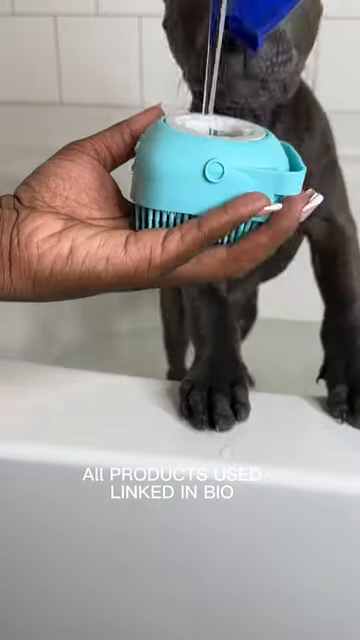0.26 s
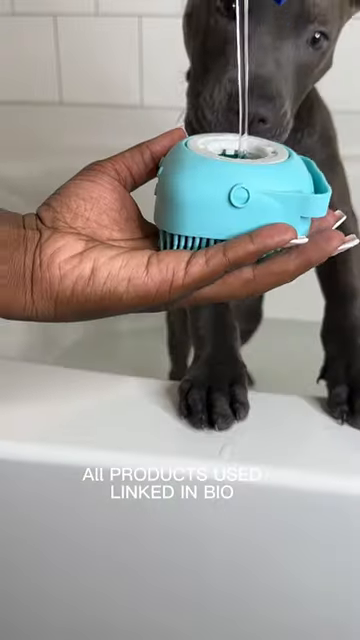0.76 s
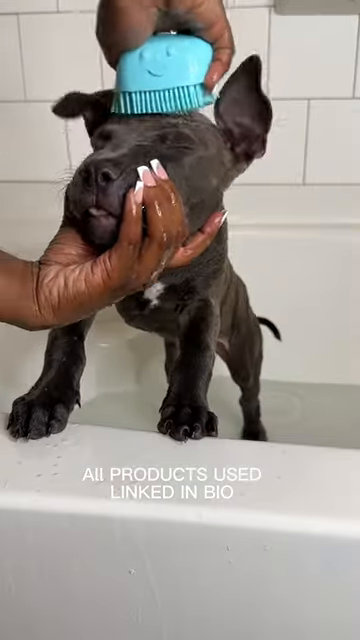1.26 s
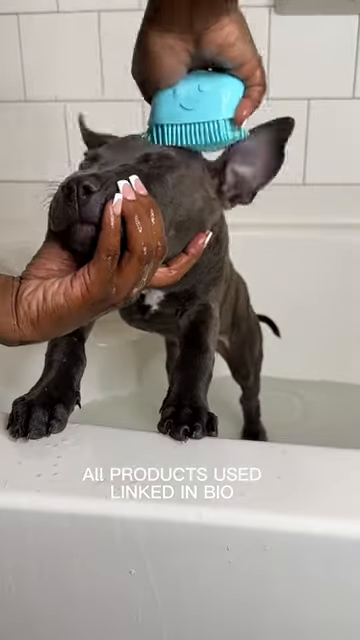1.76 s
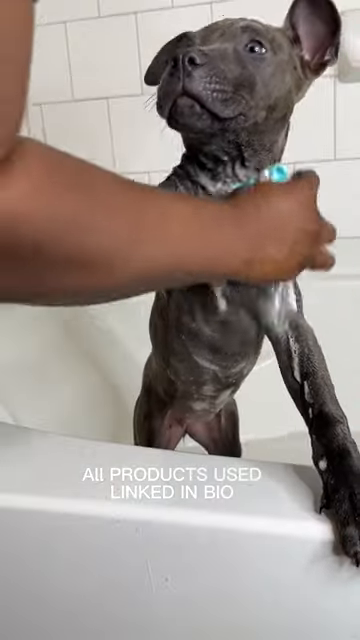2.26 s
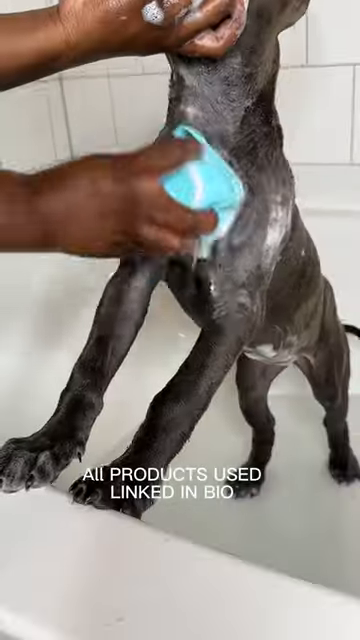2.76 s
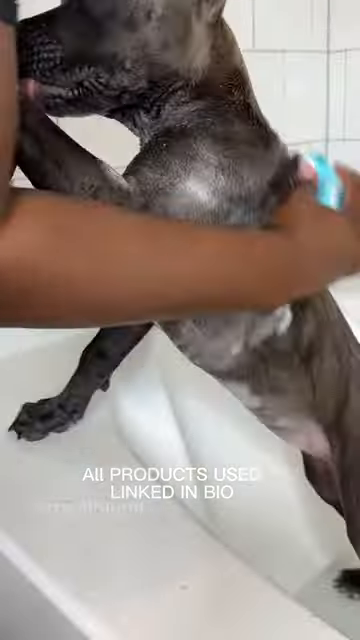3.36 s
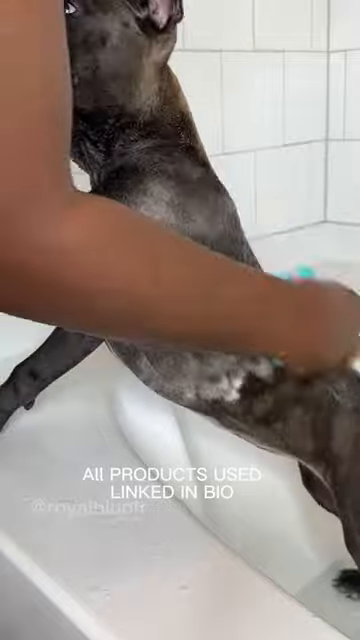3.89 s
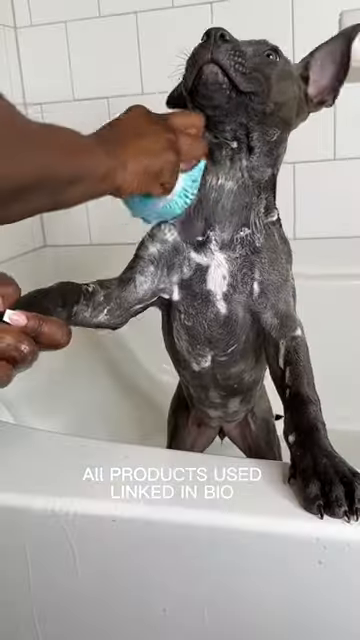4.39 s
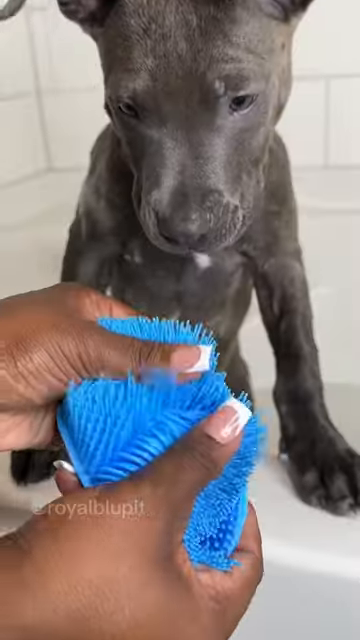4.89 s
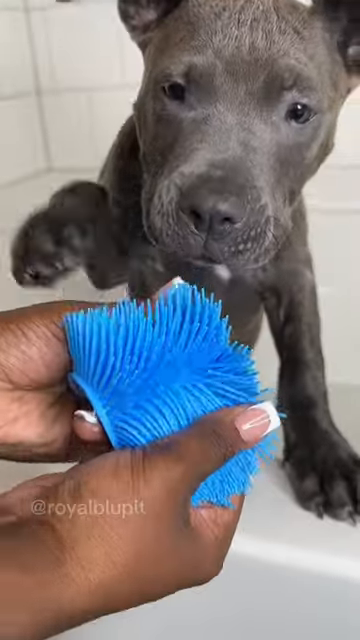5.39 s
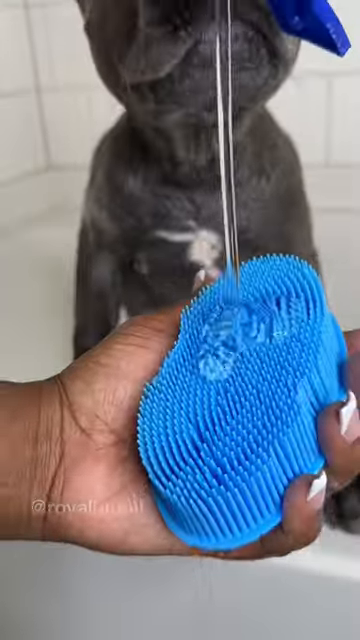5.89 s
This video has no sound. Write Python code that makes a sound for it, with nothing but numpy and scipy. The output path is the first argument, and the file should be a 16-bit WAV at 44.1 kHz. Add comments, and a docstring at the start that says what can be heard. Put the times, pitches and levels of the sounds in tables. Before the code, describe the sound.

Shampoo trickles and bubbles into a hollow brush, wet scrubbing rasps and squeaks on fur, soft bristles riffle, then gel plops in a tiled bathroom.

```python
"""Washing a dog in a tub

In a string of short cuts, shampoo trickles and bubbles into a hollow brush (ringing bubbles and resonances),
the brush scrubs wet fur (coloured grit that follows strokes) and squeaks while paws shake the tub (low modes),
thumbs riffle soft bristles (clumped ticks) and gel plops onto a mitt (bubbles again).
A tiled bathroom hums faintly behind (coloured noise); a small two-port microphone is close by."""
import sys
import numpy as np
from scipy import signal
from scipy.fft import rfft, irfft
from scipy.io import wavfile
from scipy.ndimage import uniform_filter1d

SR = 44100
rng = np.random.default_rng(int(sys.argv[2]) if len(sys.argv) > 2 else 0)


def transcribe(signal):
    """Save signal, clipped to [-1, 1], as a 16-bit WAV file at the path in sys.argv[1]."""
    frames = np.atleast_2d(signal).T
    limited = np.clip(frames, -1, 1)
    pcm = np.round(limited * 32767).astype(np.int16)
    wavfile.write(sys.argv[1], SR, pcm)


def ratio_of_db(decibels):
    """Turn decibels (scalar or array-like) into linear amplitude factors; 0 dB maps to 1."""
    return 10 ** (np.asarray(decibels, float) / 20)


N = 270774

# The two pours, as curves over time. Each row: time in seconds, gain of the fizz in dB,
# gain of the air cavity in dB, cavity pitch in Hz.
POURS = [
    [(0.238, -67, -99, 1030), (0.27, -77, -100, 1100), (0.414, -71, -103, 940), (0.575, -64, -60, 1090),
     (0.625, -61.5, -49, 1090), (0.69, -73, -60, 880), (0.8, -69.5, -57.5, 920), (1.0, -73, -62.5, 983),
     (1.084, -69, -74.5, 1140), (1.17, -67.5, -58, 1150)],
    [(5.79, -74, -69, 1080), (5.855, -62, -77, 830), (5.875, -52.5, -55, 724), (5.93, -67.5, -57, 750),
     (5.966, -53, -67, 940), (6.03, -65, -63, 740), (6.045, -58, -53, 850), (6.14, -56.5, -65, 770)],
]


def scrub():
    """Bristles drag through lather: dense grit, split into squelch, rasp and fizz that follow each stroke."""
    # Colour of the rubbing. Each row: frequency in Hz, density in dB per Hz.
    fur = [(300, -6.5), (450, -11.5), (1220, -21.5), (2560, -24), (3330, -24), (6730, -24), (9000, -27),
           (12000, -26), (16000, -42)]
    rub = coloured(grit(900, 3.7, 1.97), fur)
    # uneven patches in time and pitch
    _, _, z = signal.stft(rub, SR, nperseg=512)
    patches = uniform_filter1d(rng.standard_normal(z.shape), 6, 0)
    patches = evened(uniform_filter1d(patches, 5, 1))
    rub = signal.istft(z * ratio_of_db(2.3 * patches), SR, nperseg=512)[1][:N]

    stroke = pressure(0)
    squelch = pressure(1) * evened(band(rub, 444, 937))
    rasp = stroke * evened(band(rub, 1080, 2705))
    # the fizz swings less than the stroke; its balance per cut holds for a stroke at the pivot level
    pivot_db, follow = -55, 0.84
    fizz_gain = ratio_of_db(per_cut(1) + pivot_db) * (stroke / ratio_of_db(pivot_db)) ** follow
    fizz = fizz_gain * evened(band(rub, 3650, SR * 0.4))
    out = squelch + rasp + fizz
    add_smacks(out, fur)
    return out


def add_smacks(out, fur):
    """Wet landings of the brush: wide noise mixed with a foam pocket whose pitch sinks as it dies."""
    # Each row: time in seconds, peak in dB, pitch it sinks to in Hz, decay by 60 dB in seconds,
    # share of wide noise from 0 to 1.
    smacks = [(1.3546, -44, 3150, 0.45, 0), (1.503, -44, 5700, 0.11, 0.5), (1.93, -38, 1780, 0.026, 0.05),
              (2.0249, -38, 4050, 0.085, 0.82), (2.106, -36.5, 840, 0.32, 0), (2.489, -39, 700, 0.19, 0.1),
              (2.621, -44.5, 920, 0.3, 0.64), (2.893, -40, 1290, 0.33, 0), (3.177, -47, 1380, 0.044, 0.22),
              (3.688, -53, 1000, 0.088, 0.4), (3.833, -40, 1810, 0.041, 0.1), (3.986, -44, 820, 0.15, 0.3),
              (4.12, -48.5, 1600, 0.079, 0.2), (4.251, -40, 1500, 0.011, 0.2),
              (4.2657, -42, 1400, 0.033, 0.26), (4.419, -42, 1440, 0.014, 0)]
    sink, sink_s = 0.35, 0.025  # starts this share too high; time constant
    width_share, land_s = 0.55, 0.0008  # resonator width over pitch; landing time constant
    t = np.arange(SR // 4) / SR
    for s, db, hz, t60, share in smacks:
        puff = rng.standard_normal(len(t))
        wide = coloured(puff, fur)
        glide_hz = hz * (1 + sink * np.exp(-t / sink_s))
        pocket = resonate_twice(puff, glide_hz, width_share * hz)
        burst = share * evened(wide) + (1 - share) * evened(pocket)
        tick = 0.34 * np.exp(-t / 0.00059)
        burst *= (ratio_of_db(-60 * t / t60) + tick) * (1 - np.exp(-t / land_s))
        add(out, s, ratio_of_db(db) * burst / abs(burst).max())


def trickle():
    """Tiny bubbles, the walls and air space of the filling brush that drops excite, and the big bubbles."""
    # Pitches that the small bubbles favour. Each row: frequency in Hz, density in dB per Hz.
    bubble_pitches = [(880, -15), (1500, 2.5), (1880, -5), (2410, -0.5), (2830, -11), (3620, -8.5),
                      (4370, -13), (4970, -8.5), (6180, -13), (7460, -6.5), (10900, -1), (15100, -34),
                      (16000, -38)]
    # Single bubbles. Each row: time in seconds, peak in dB, starting pitch in Hz,
    # decay by 60 dB in seconds (capped below).
    big_bubbles = [(0.2452, -42.5, 5330, 0.018), (0.272, -32.5, 4840, 0.0076), (0.3986, -38, 2880, 0.016),
                   (0.4114, -40.5, 5100, 0.0049), (0.4202, -42, 3030, 0.014), (0.425, -33.5, 1610, 0.0047),
                   (0.4464, -35, 6970, 0.003), (0.45, -44.5, 3120, 0.015), (0.468, -38, 1600, 0.012),
                   (0.491, -39.5, 7240, 0.0094), (0.4917, -42.5, 1810, 0.013), (0.517, -40.5, 3360, 0.015),
                   (0.5566, -41.5, 4900, 0.0091), (0.556, -41, 1676, 0.08), (0.59, -30.5, 1090, 0.023),
                   (0.613, -40.5, 1250, 0.054), (0.624, -40.5, 1350, 0.015), (0.629, -53, 2770, 0.035),
                   (0.633, -32, 1070, 0.025), (0.641, -29, 1116, 0.036), (0.656, -40.5, 4280, 0.011),
                   (0.663, -34.5, 1110, 0.019), (0.683, -40.5, 3000, 0.015), (0.724, -43, 980, 0.031),
                   (0.745, -44, 946, 0.07), (0.763, -39, 1050, 0.027), (0.779, -46, 940, 0.032),
                   (0.79, -39.5, 913, 0.052), (0.8044, -40, 3060, 0.008), (0.832, -46.5, 895, 0.033),
                   (0.8628, -38.5, 4300, 0.008), (0.97, -54, 980, 0.025), (1.042, -45, 2600, 0.016),
                   (1.098, -46.5, 1750, 0.01), (1.099, -40.5, 2800, 0.018), (1.124, -35.5, 1490, 0.0056),
                   (5.8156, -42, 4190, 0.021), (5.818, -50, 1140, 0.032), (5.8656, -39.5, 6600, 0.035),
                   (5.868, -32.5, 732, 0.0098), (5.914, -34.5, 4280, 0.018), (5.913, -36.5, 5430, 0.011),
                   (5.9563, -37, 4200, 0.024), (5.956, -45, 2570, 0.022), (5.962, -43.5, 1620, 0.03),
                   (5.932, -52, 1670, 0.026), (6.056, -42, 1760, 0.081), (6.003, -50, 3330, 0.023),
                   (6.07, -42, 2770, 0.03), (5.9688, -33.5, 2760, 0.012), (5.97, -34.5, 4240, 0.02),
                   (6.0365, -42, 2800, 0.01), (6.039, -40.5, 448, 0.0048), (6.051, -31, 2380, 0.0048),
                   (6.051, -30.5, 1870, 0.018), (6.081, -38.5, 740, 0.0031), (6.0903, -46, 5200, 0.039),
                   (6.133, -49, 4360, 0.013)]
    mist = evened(coloured(rng.standard_normal(N), bubble_pitches))
    tiny = grains(bubble_pitches, 1757, 12030, per_s=22, cycles=21, onset=5.4, spread_db=4.15, clump=1.1)
    in_brush = np.arange(N) < POURS[0][-1][0] * SR  # until the first pour ends
    froth = 1.2 * tiny + np.where(in_brush, 2.7 * brush_walls() + 0.08 * mist, 0.7 * mist)

    sway = 1 + 0.015 * wander(5, 40)
    cavity_hz = curve(POURS, 3, off=1200) * sway
    slosh = grit(170, 2, 0.35)
    cavity = evened(resonate_twice(slosh, cavity_hz, 130, 200))
    out = ratio_of_db(curve(POURS, 1)) * froth + ratio_of_db(curve(POURS, 2)) * cavity
    for s, db, hz, t60 in big_bubbles:
        add(out, s, ratio_of_db(db) * plop(hz, min(t60, 0.09), rng.standard_normal(SR // 10)))
    return out


def brush_walls():
    """Drops landing on the hollow brush ring its modes, whose pitches drift and levels waver."""
    # Modes of the hollow brush. Each row: mean frequency in Hz, width of the first resonator in Hz, level in dB.
    modes = [(1900, 180, -8), (2950, 200, 4.5), (4420, 200, 1), (6300, 330, -1), (7800, 300, -5)]
    landing = grit(70, 4, 0.05)  # shared by all modes
    walls = np.zeros(N)
    for hz, width, db in modes:
        drops = (0.5 * landing + grit(300, 3.5, 0.25)) * ratio_of_db(4 * wander(2, 12))
        drifting_hz = hz * (1 + 0.04 * wander(3, 25))
        walls += ratio_of_db(db) * evened(resonate_twice(drops, drifting_hz, width, 2.8 * width))
    return evened(walls)


def plop(hz, t60, noise):
    """A big bubble: a ring held for a moment, roughened by the splash around it and the landing thud."""
    tone = ring(hz, t60, 0.078, 1.26)
    t = np.arange(len(tone)) / SR
    noise = noise[:len(t)]
    splash = evened(resonate_twice(noise, hz, 0.27 * hz, 0.29 * hz))
    splash *= np.exp(-(t / (0.42 * t60)) ** 2) * (1 - np.exp(-t * hz / 1.3))
    thud = resonate_twice(noise * np.exp(-t * hz), 0.98 * hz, hz)
    both = tone + 0.32 * splash + 0.99 * thud
    return both / abs(both).max()


def riffle():
    """Soft bristles bend and flick back in clumps, each a rubbery tick."""
    # Thumb passes. Each row: start in seconds, length in seconds, gain in dB, change by the end in dB.
    passes = [(4.728, 0.1, -53.5, -29), (4.8, 0.26, -63.5, 1.5), (5.068, 0.1, -63.5, 0),
              (5.2, 0.09, -61.5, -7), (5.312, 0.151, -63, -5.5), (5.492, 0.15, -59, -10),
              (5.662, 0.016, -62.5, -2)]
    # Colour of the bristles. Each row: frequency in Hz, density in dB per Hz.
    bristle = [(450, 11.5), (1080, -1), (1530, 0), (2650, 0), (3300, 0), (4400, 2), (5200, -1.5), (6300, 2),
               (9260, -1), (16000, -16)]
    # Modes of a flicked bristle. Each row: frequency in Hz, width of the first resonator in Hz, level in dB.
    bristle_modes = [(1600, 440, -9.5), (2070, 1300, 0), (2700, 300, -6), (4200, 440, -10)]
    # The loudest flicks. Each row: time in seconds, peak in dB, pitch in Hz.
    flicks = [(4.7282, -47, 1580), (4.8067, -53, 1530), (4.8174, -50, 2600), (4.824, -48, 2590),
              (4.8624, -50, 2560), (4.883, -46, 2660), (4.894, -39.5, 2600), (4.9468, -48, 2650),
              (5.0034, -45.5, 2700), (5.1105, -48, 2160), (5.1461, -40.5, 1680), (5.224, -46, 1610),
              (5.256, -47, 2400), (5.268, -53, 2300), (5.32, -43.5, 1910), (5.3283, -41, 2480),
              (5.371, -42, 2200), (5.3924, -46, 2620), (5.407, -49, 2700), (5.492, -48, 2700),
              (5.497, -41.5, 2800), (5.527, -45, 2700), (5.564, -50, 2600), (5.639, -49, 2200),
              (5.672, -44.5, 2700)]
    clumps = np.exp(0.5 * wander(9, 49))
    shared = grit(170, 3, 0.1)
    crackle = np.zeros(N)
    for hz, width, db in bristle_modes:
        drive = (shared + 1.1 * grit(300, 1.4, 0.2)) * clumps
        crackle += ratio_of_db(db) * evened(resonate_twice(drive, hz, width, 2 * width))
    rustle = evened(coloured(rng.standard_normal(N), bristle))
    ticks = grains(bristle, 1147, 16500, per_s=120, cycles=19, onset=2.2, spread_db=4.7, clump=0.55)
    thumb = held(passes, attack=0.014, release=0.02)
    out = thumb * (0.55 * ticks + 0.5 * rustle + 0.94 * evened(crackle))

    fade = np.exp(-np.arange(300) / (0.001 * SR))
    for s, db, hz in flicks:
        burst = np.pad(rng.standard_normal(300) * fade, (0, 300))
        flick = evened(coloured(burst, bristle)) + 2.9 * evened(resonate_twice(burst, hz, 830))
        add(out, s, ratio_of_db(db) * flick / abs(flick).max())
    return out


def squeak():
    """Stick and slip of rubber on wet fur: a fuzzy, fluttering tone and its octave."""
    # Three squeaks, as curves. Each row: time in seconds, pitch in Hz, tone level in dB, octave level in dB.
    squeaks = [
        [(3.23, 1110, -65, -71), (3.27, 1090, -57, -72), (3.31, 1080, -67, -75)],
        [(4.264, 1203, -49, -52), (4.294, 1276, -53.5, -46.5), (4.31, 1220, -49, -56.5),
         (4.412, 1250, -68.5, -72)],
        [(4.418, 1780, -56.5, -77), (4.45, 1220, -46.5, -82), (4.52, 1180, -65, -72)],
    ]
    hz = curve(squeaks, 1, off=800)
    drive = grit(300, 1.5, 1.0)
    tone = evened(resonate_twice(drive, hz, 135))
    octave = evened(resonate_twice(drive, 2 * hz, 330))
    return ratio_of_db(curve(squeaks, 2)) * tone + ratio_of_db(curve(squeaks, 3)) * octave


def tub():
    """The shell booms and drums in a few low modes; paws and water shake it and paws knock on it."""
    # Modes of the shell, boom then drum. Each row: frequency in Hz, resonator width in Hz, level in dB.
    shell = [(57.7, 12.7, 1), (79.1, 22, 0.5), (102.3, 29, -3.5)], [(184, 99, 3.5), (232, 86, 4),
             (330, 28, 3.5)]
    # Shakes by paws and water. Each row: start in seconds, length in seconds, boom in dB, drum in dB,
    # change by the end in dB.
    shakes = np.array([(0.108, 0.11, -63, -63.5, 2.5), (1.348, 0.11, -53.5, -62, -3),
                       (1.595, 0.087, -56, -75, -2), (1.909, 0.067, -55, -64.5, 5),
                       (3.223, 0.078, -56, -62, -9), (3.394, 0.13, -44, -50, -6),
                       (3.546, 0.34, -42, -45, -10), (4.514, 0.18, -50, -52.5, -7.5),
                       (5.496, 0.17, -71, -65.5, 5), (5.866, 0.19, -54.5, -60, -6.5),
                       (6.042, 0.1, -56, -53, -14)])
    # Paw knocks. Each row: time in seconds, peak in dB, pitch in Hz, decay by 60 dB in seconds.
    knocks = [(1.362, -47, 68.4, 0.056), (3.437, -38.5, 74.4, 0.44), (3.828, -42, 68.5, 0.21),
              (4.511, -38.5, 115, 0.053), (4.525, -36, 64, 0.38), (4.649, -41.5, 97, 0.054)]
    out, drive = np.zeros(N), rng.standard_normal(N)
    # each stroke leans on the tub and makes it drum, smoothed over 10 ms
    push = ratio_of_db(-8.5) * uniform_filter1d(pressure(0), round(0.01 * SR))
    for column, modes, lean in [(2, shell[0], 0), (3, shell[1], push)]:
        hum = sum(ratio_of_db(db) * evened(resonate_twice(drive, hz, width)) for hz, width, db in modes)
        shake = held(shakes[:, [0, 1, column, 4]], attack=0.011, release=0.031)
        rest = ratio_of_db(per_cut(column))
        out += np.sqrt(rest ** 2 + shake ** 2 + lean ** 2) * evened(hum)
    for s, db, hz, t60 in knocks:
        add(out, s, ratio_of_db(db) * ring(hz, t60, 0, 0.59))
    return out


def air():
    """Steady hum and hiss of the bathroom at rest: coloured noise."""
    # Each row: frequency in Hz, density in dB per Hz.
    room_tone = [(25,-41), (70,-10.5), (160,-13), (230,-15), (530,-18.5), (860,-29), (1520,-25), (7000,-35),
                 (16000,-39.5)]
    return ratio_of_db(-72.5) * evened(coloured(rng.standard_normal(N), room_tone))


def tiles(x, t60=0.14):
    """Diffuse tail of the tiled room: sparse taps of random sign."""
    taps = np.zeros(SR // 2)
    at = np.arange(100, len(taps) - 20, 20)
    signs = rng.choice([-1., 1.], len(at))
    taps[at + rng.integers(0, 20, len(at))] = signs * ratio_of_db(-60 * at / SR / t60)
    return signal.oaconvolve(x, taps / np.linalg.norm(taps))[:N]


def per_cut(column):
    """One column of the cuts at every sample."""
    # Each row: start in seconds, lather fizz in dB against a stroke at the fizz pivot,
    # resting boom of the tub in dB, its resting drum in dB.
    cuts = np.array([(0, -9.5, -74, -76.5), (0.238, -12, -68, -94), (1.168, -0.5, -64.5, -66),
                     (1.902, -4, -59.5, -63.5), (2.602, -5.5, -63.5, -67), (3.351, -1.5, -65, -68.5),
                     (4.05, -13, -63, -71.5), (4.72, -20, -64, -76.5), (5.7, -14, -69, -79)])
    return cuts[np.searchsorted(cuts[:, 0], np.arange(N) / SR, "right") - 1, column]


def pressure(squelch):
    """Gain of all strokes of hand and brush: each swells to its peak and fades, within its own cut."""
    # Each row: peak time in seconds, level in dB, rise in seconds, fall in seconds, squelch in dB against it.
    strokes = [(0.206, -65.5, 0.053, 0.03, 1.5), (1.19, -56.5, 0.019, 0.17, -6.5),
               (1.368, -60.5, 0.03, 0.09, -0.5), (1.56, -66, 0.44, 0.68, -3.5),
               (1.69, -64, 0.3, 0.12, -5.5), (1.933, -49, 0.024, 0.087, -5), (2.05, -54.5, 0.1, 0.12, -6),
               (2.128, -55, 0.28, 0.063, -1.5), (2.3, -59.5, 1, 1, -3), (2.535, -49.5, 0.14, 0.18, -5.5),
               (2.64, -54, 0.076, 0.12, -5), (2.908, -53, 0.25, 0.2, -0.5), (3.03, -59.5, 0.49, 0.11, -7),
               (3.201, -51, 0.061, 0.15, -4), (3.421, -50, 0.15, 0.1, -3.5), (3.54, -53.5, 0.14, 0.13, 1),
               (3.697, -51, 0.13, 0.17, 2), (3.838, -50, 0.034, 0.14, -3), (4.01, -48.5, 0.11, 0.086, -4),
               (4.15, -52.5, 0.061, 0.35, -2), (4.279, -54, 0.12, 0.1, -22), (4.424, -57.5, 0.008, 1, 0.5),
               (4.651, -47.5, 0.043, 0.058, -2.5)]
    span_db, roundness = 21.5, 1.16  # rise and fall each span this many dB
    t, start, power = np.arange(N) / SR, per_cut(0), np.full(N, 1e-12)
    for s, db, rise, fall, squelch_db in strokes:
        away = np.where(t < s, (s - t) / rise, (t - s) / fall)
        same_cut = start == start[round(s * SR)]
        power += same_cut * ratio_of_db(db + squelch * squelch_db - span_db * away ** roundness) ** 2
    return np.sqrt(power)


def held(rows, attack, release):
    """Gain of events (start, length, dB, fade dB): attack, a fading hold, release; both edges span 20 dB."""
    t, power = np.arange(N) / SR, np.zeros(N)
    for s, length, db, fade_db in rows:
        edge = np.maximum((s - t) / attack, 0) + np.maximum((t - s - length) / release, 0)
        power += ratio_of_db(db + fade_db * np.clip((t - s) / length, 0, 1) - 20 * edge) ** 2
    return np.sqrt(power)


def curve(tables, column, off=-120):
    """One column of some curve tables at every sample, with the value off outside them."""
    t, out = np.arange(N) / SR, np.full(N, float(off))
    for rows in map(np.array, tables):
        inside = (t >= rows[0, 0]) & (t <= rows[-1, 0])
        out[inside] = np.interp(t[inside], rows[:, 0], rows[:, column])
    return out


def ring(hz, t60, rise, onset):
    """A dying tone that swells over some cycles and, given a rise, climbs as a bubble nearing the surface."""
    t = np.arange(int(max(t60, 0.002) * SR)) / SR
    tone = np.sin(2 * np.pi * hz * t * (1 + rise * t / t60))
    tone *= ratio_of_db(-60 * t / t60) * (1 - np.exp(-(t * hz / onset) ** 2))
    return tone / abs(tone).max()


def grains(points, lo_hz, hi_hz, per_s, cycles, onset, spread_db, clump):
    """Short rings of 30 pitches, weighted by a spectrum, coming in clumps; per_s counts each pitch."""
    pace = np.exp(clump * wander(2.7, 30))
    sizes = ratio_of_db(spread_db * np.minimum(rng.exponential(1, N), 4))
    out = np.zeros(N)
    for hz in np.geomspace(lo_hz, hi_hz, 30):
        train = sizes * (rng.random(N) < per_s / SR * pace / pace.mean())
        out += ratio_of_db(read(points, hz)) * hz * signal.oaconvolve(train, ring(hz, cycles / hz, 0.021, onset))[:N]
    return evened(out)


def grit(per_s, spread_db, noise):
    """Clicks of uneven size over a bed of noise."""
    size = ratio_of_db(spread_db * np.minimum(rng.exponential(1, N), 4)) * rng.choice([-1, 1], N)
    clicks = evened(size * (rng.random(N) < per_s / SR))
    return evened(clicks + noise * rng.standard_normal(N))


def wander(lo_hz, hi_hz):
    """Slow random motion of rms 1: band-passed noise."""
    return evened(band(rng.standard_normal(N), lo_hz, hi_hz))


def resonate(x, hz, width):
    """One resonance: shifts the pitch or curve hz down to zero, smooths, and shifts back."""
    turn = np.exp(2j * np.pi * np.cumsum(hz * np.ones(len(x))) / SR)
    r = np.exp(-np.pi * width / SR)
    return 2 * (turn * signal.lfilter([1 - r], [1, -r], x / turn)).real


def resonate_twice(x, hz, width, second_width=None):
    """Two resonances in a row at one pitch, for steeper skirts."""
    return resonate(resonate(x, hz, width), hz, second_width or width)


def band(x, lo_hz, hi_hz):
    """Band-pass."""
    return signal.sosfilt(signal.butter(3, [lo_hz, hi_hz], "band", fs=SR, output="sos"), x)


def read(points, hz):
    """A spectrum table read on a log axis."""
    f, value = np.transpose(points)
    return np.interp(np.log(hz + 1), np.log(f + 1), value)


def coloured(x, points):
    """Filters with a causal, minimum-phase response of the given spectrum."""
    db = np.maximum(read(points, abs(np.fft.fftfreq(4096, 1 / SR))), -100)
    response = np.fft.ifft(np.exp(np.conj(signal.hilbert(np.log(ratio_of_db(db)))))).real[:2048]
    return signal.oaconvolve(x, response)[:len(x)]


def evened(x):
    """Scales to rms 1."""
    return x / np.sqrt(np.mean(x ** 2) + 1e-20)


def add(mix, s, sound):
    """Mixes a sound in at s seconds."""
    part = mix[round(s * SR):][:len(sound)]
    part += sound[:len(part)]


def scene():
    """The first pour sits square before the two ports; the rest reaches them shifted in phase."""
    # Phase by which the left port leads. Each row: frequency in Hz, phase in radians.
    port_phase = [(900, 0), (1400, .25), (1900, 0), (2200, .1), (2800, .5), (3400, 0), (4700, 0),
                  (5500, -.5), (7410, -1.4), (9390, -2.3), (10600, -3.1), (13600, -3.2), (14200, -4.6),
                  (16100, -5.0)]
    # Diffuse sound, opposite in the two ports. Each row: frequency in Hz, gain in dB.
    diffuse_gain = [(60, -30), (200, -11), (380, -9.5), (700, -5), (1300, -13.5), (1900, -31.5),
                    (4700, -16.5), (6500, -22), (9500, -22), (14000, -14)]
    close = trickle() + riffle()
    mix = close + ratio_of_db(-10.5) * tiles(close) + scrub() + squeak() + tub() + air()
    t, hz = np.arange(N) / SR, np.fft.rfftfreq(N, 1 / SR)
    first, last = POURS
    in_first = (t > first[0][0]) & (t < first[-1][0])
    # from the last pour on, a small share is square too
    square = mix * np.where(in_first, 1, np.where(t > last[0][0], 0.15, 0))
    aside = mix - square

    low_pass = signal.butter(4, 600, fs=SR, output="sos")
    spread = aside + signal.sosfilt(low_pass, square)
    diffuse = irfft(rfft(tiles(spread, 0.19)) * ratio_of_db(read(diffuse_gain, hz)), N)
    turn = np.exp(0.5j * read(port_phase, hz))  # half the lead on each side
    left = irfft(rfft(aside) * turn, N)
    right = irfft(rfft(aside) / turn, N)
    return np.array([left + square + diffuse, right + square - diffuse])


def roll_off(x):
    """The treble ends steeply here."""
    return signal.sosfilt(signal.butter(12, 16520, fs=SR, output="sos"), x)


def record(dry):
    """Limits the band to 15.9 kHz and silences short gaps at some of the cuts."""
    # Each row: start of the silence in seconds, its end in seconds.
    gaps = [(0.227, 0.2385), (4.712, 4.728), (5.689, 5.702)]
    t = np.arange(N) / SR
    low_pass = signal.firwin(511, 15900, window=("kaiser", 8), fs=SR)
    mix = signal.oaconvolve(dry, low_pass[None], "same")
    for start, end in gaps:
        mix = mix * np.clip(np.maximum(start - t, t - end) / 0.001, 0, 1)  # 1 ms ramps
    return roll_off(mix)


dry = scene()
out = record(dry)
transcribe(out)
```